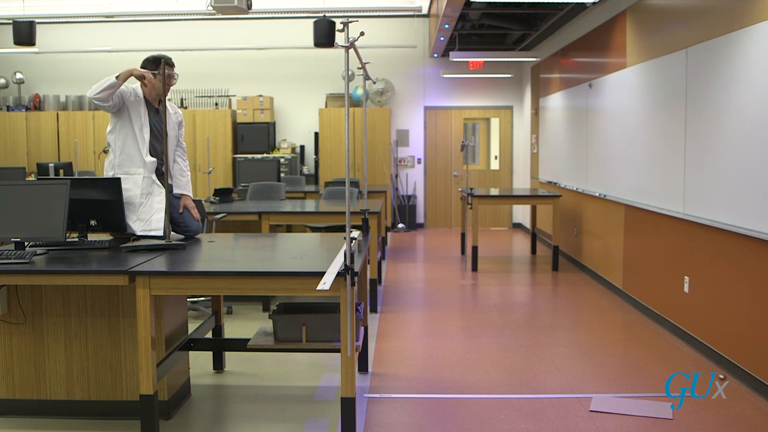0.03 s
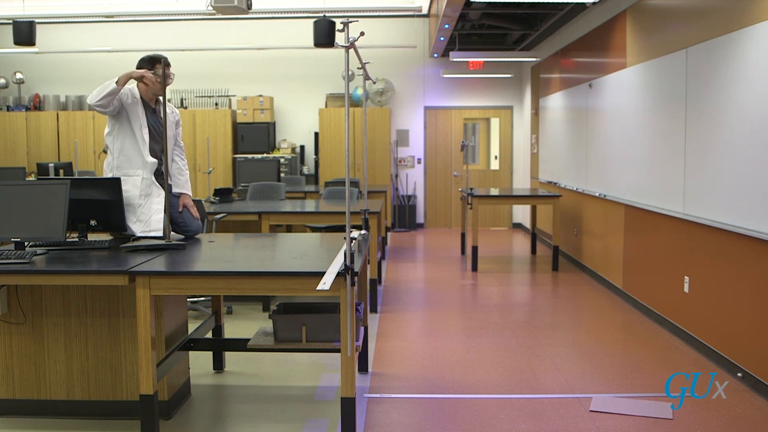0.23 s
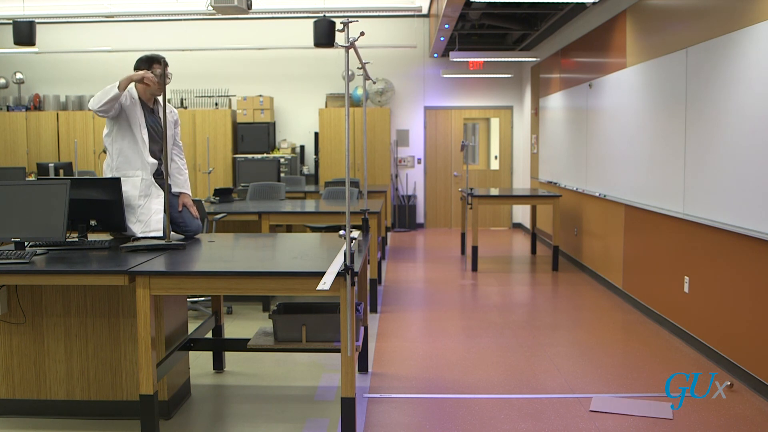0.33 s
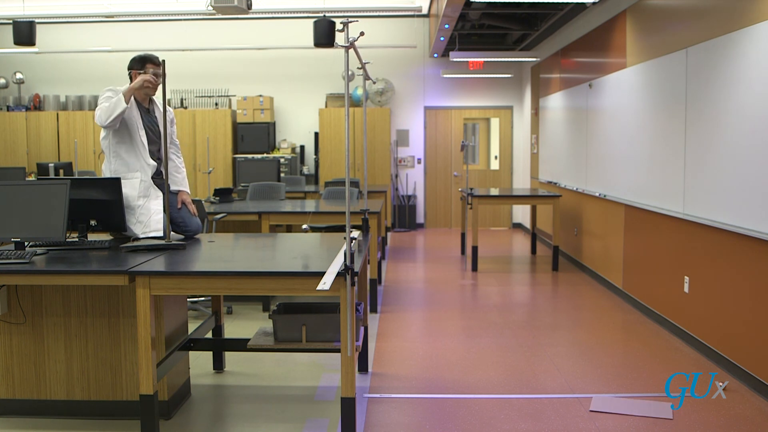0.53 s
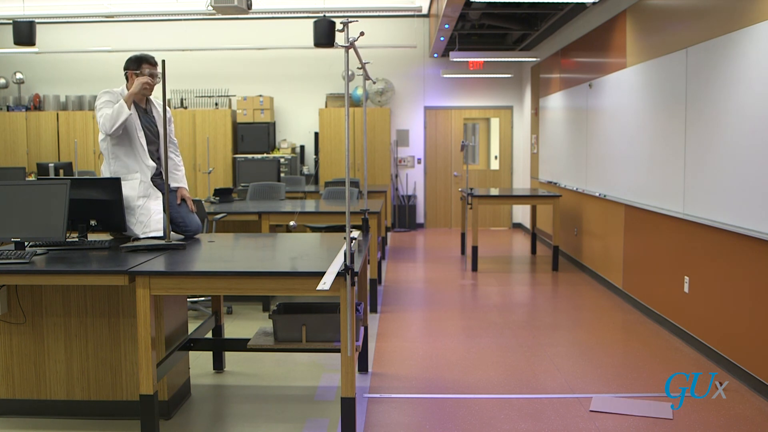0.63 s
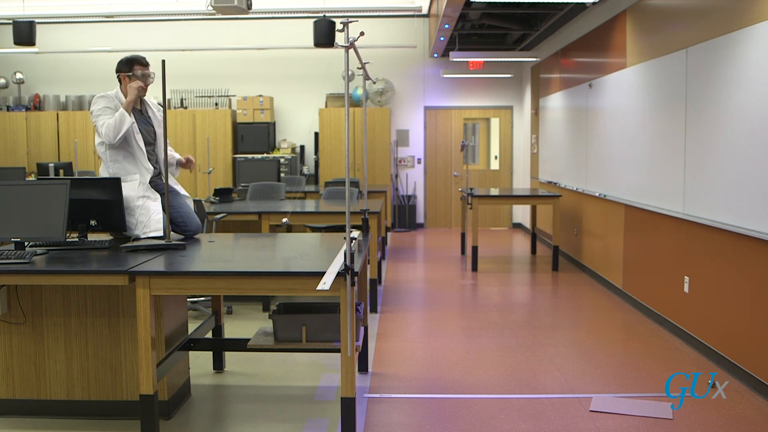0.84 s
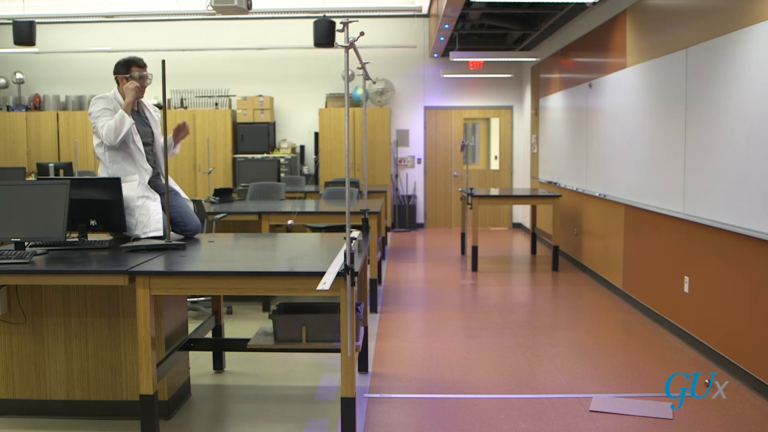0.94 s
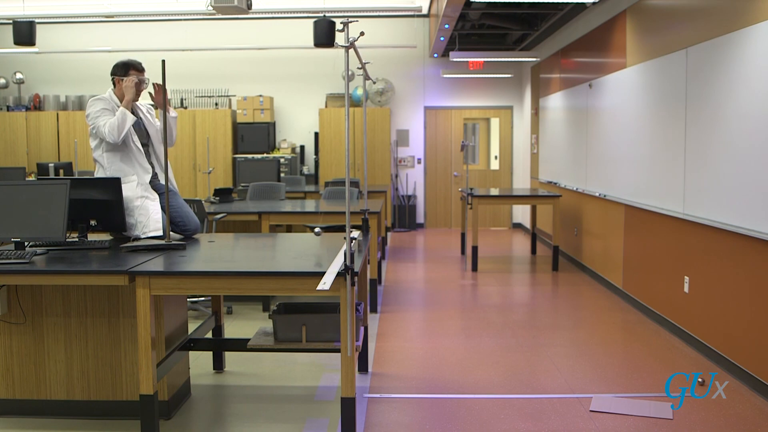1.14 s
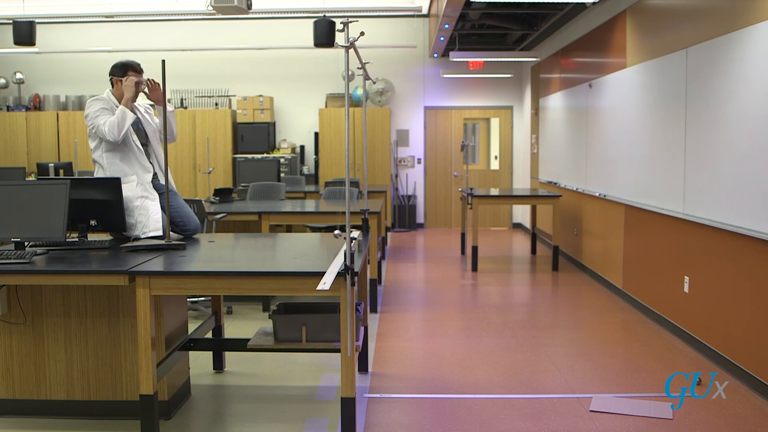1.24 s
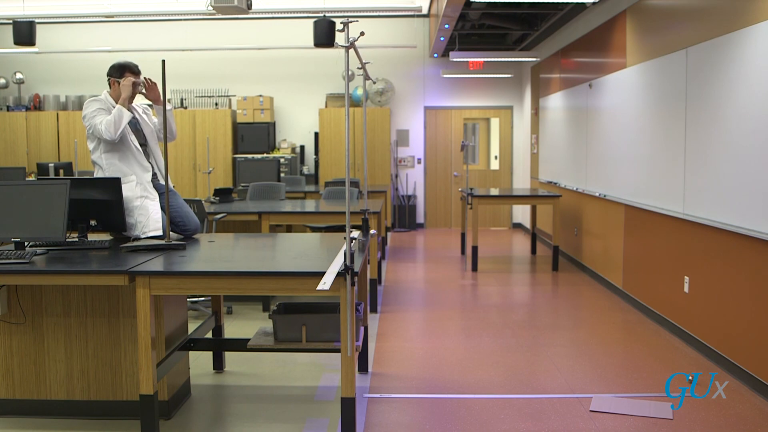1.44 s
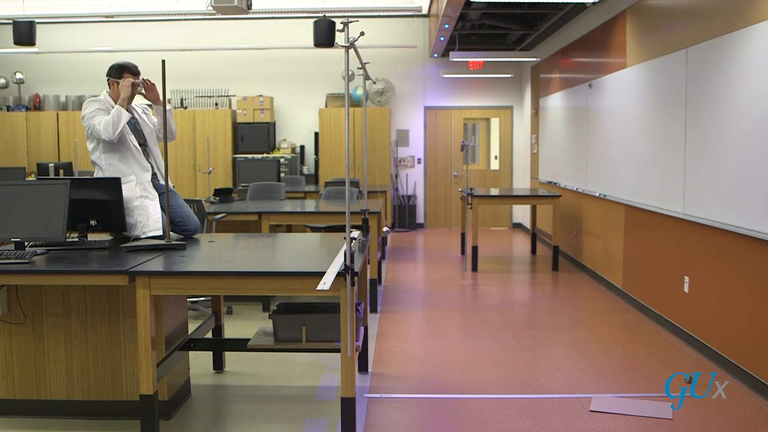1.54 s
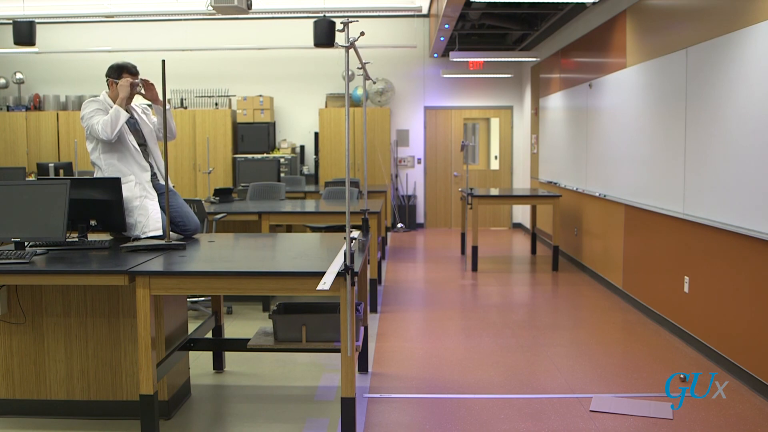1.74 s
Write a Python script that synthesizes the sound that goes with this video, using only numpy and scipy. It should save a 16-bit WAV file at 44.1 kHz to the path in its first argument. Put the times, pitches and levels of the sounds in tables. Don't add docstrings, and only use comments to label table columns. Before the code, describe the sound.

Small hard ball impacts in a furnished classroom lab: a woody bench thud, a quiet gap with faint cloth rustle, then a loud floor crack and softer bounce with short room ring, over low ventilation, single distant microphone.

```python
import sys
import numpy as np
from scipy import signal
from scipy.io import wavfile
from scipy.ndimage import uniform_filter1d

SR = 44100
rng = np.random.default_rng(int(sys.argv[2]) if len(sys.argv) > 2 else 0)


def dump(signal):
    limited = np.clip(np.atleast_2d(signal).T, -1, 1)
    pcm = np.round(limited * 32767).astype(np.int16)
    wavfile.write(sys.argv[1], SR, pcm)


def level_to_linear(level):
    exponent = np.asarray(level, float) / 20
    return 10 ** exponent


N = 79380

BENCH_LOW_HZ, FLOOR_LOW_HZ = 95, 330


def rms_one(x):
    return x / np.sqrt(np.mean(x ** 2) + 1e-20)


def at_hz(points, hz):
    curve_hz, value = np.transpose(points)
    return np.interp(np.log(hz), np.log(curve_hz), value)


def ring(clicks, hz, t60):
    radius = level_to_linear(-60 / (t60 * SR))
    angle = 2 * np.pi * hz / SR
    return signal.lfilter([0, np.sin(angle)], [1, -2 * radius * np.cos(angle), radius ** 2], clicks + 1e-18)


def highpass(x, low_hz):
    return signal.sosfilt(signal.butter(2, low_hz, "high", fs=SR, output="sos"), x)


def struck(contacts, modes, low_hz):
    out = np.zeros(N)
    for s, db, cut_hz, sign in contacts:
        spread_db = rng.normal(0, 2, 14) * (db < -4)
        soft = np.exp(-2 * np.pi * cut_hz / SR)
        for (hz, mode_db, t60, *delay), own_db in zip(modes, spread_db):
            i = int((s + sum(delay)) * SR)
            click = np.zeros(min(N - i, int(1.5 * t60 * SR)))
            click[0] = np.sign(sign) * level_to_linear(db + mode_db + own_db)
            pulse = signal.lfilter([(1 - soft) ** 2], [1, -2 * soft, soft ** 2], click)
            out[i:i + len(click)] += ring(pulse, hz, t60)
    return highpass(out + 1e-18, low_hz)


def bands():
    edges = 22 * 2 ** np.arange(0, 9.7, 1 / 3)
    white = rng.standard_normal((2, N))
    bank = []
    for k, (low, high) in enumerate(zip(edges, edges[1:])):
        band = signal.butter(2, [low, high], "band", fs=SR, output="sos")
        bank.append((np.sqrt(low * high), signal.sosfilt(band, white[k % 2])))
    return bank


def coloured(spectrum, bank, shape):
    gains = [level_to_linear(at_hz(spectrum, hz)) for hz, _ in bank]
    total = np.sqrt(sum(g * g * np.mean(x ** 2) for g, (_, x) in zip(gains, bank)))
    return sum(g * x * shape(hz) for g, (hz, x) in zip(gains, bank)) / total


def floor_knock():
    # start in seconds, level in dB, contact cutoff in Hz, direction as a sign.
    knocks = [
        (1.4004, -13, 5000, 1),
        (1.4012, -4, 5000, -1),
        (1.4019, -3, 7000, 1),
        (1.4248, -14, 4000, 1),
    ]
    # frequency in Hz, level in dB, t60 in seconds, optional delay in seconds.
    floor_modes = [(474.8, -22.5, 0.21), (672, -11, 0.019), (2100, -50, 0.035), (818, -28.5, 0.14),
                   (975.5, -26, 0.296, .012), (1186, -29.5, 0.11), (1200, -22, 0.15), (1400, -49, 0.29),
                   (1200, -20.5, 0.23), (2396, -11, 0.013), (2500, -26.5, 0.04), (3647, -30.5, 0.025),
                   (4850, -45.5, 0.24), (412.5, -28, 0.45, .01)]
    return struck(knocks, floor_modes, FLOOR_LOW_HZ)


def floor_rebound():
    # start in seconds, level in dB, contact cutoff in Hz, direction as a sign.
    bounces = [
        (1.4950, -16, 4000, 1),
        (1.4956, -3, 3000, -1),
        (1.4963, -3, 3500, 1),
        (1.4971, -4, 2500, -1),
        (1.5255, -8, 2000, 1),
    ]
    # frequency in Hz, level in dB, t60 in seconds.
    rebound_modes = [(474, -28.5, 0.16), (618, -28.5, 0.031), (698, -41.5, 0.45), (834, -32.5, 0.093),
                     (1300, -28, 0.015), (1386, -22.5, 0.1), (1632, -35.5, 0.47), (2500, -22.5, 0.013),
                     (2700, -32, 0.15), (3730, -36, .008)]
    return struck(bounces, rebound_modes, FLOOR_LOW_HZ)


def floor_crack():
    # start in seconds, level in dB, contact cutoff in Hz, direction as a sign.
    cracks = [
        (1.4015, 0, 8000, 1),
        (1.4960, -9, 2200, 1),
    ]
    # frequency in Hz, level in dB, t60 in seconds.
    crack_modes = [(1450, -14, .009), (4050, -22.5, .007), (4900, -29, .005), (204, -39, .75),
                   (213, -39, .75), (790, -22, .03), (555, -20, .06), (694, -36, .45)]
    return struck(cracks, crack_modes, BENCH_LOW_HZ)


def ball_ring():
    # frequency in Hz, level in dB, t60 in seconds.
    ball_modes = [(15500, -54, .22), (15506, -57, .35)]
    return struck([(1.403, 0, 20000, 1)], ball_modes, 1000)


def bench_thud():
    # start in seconds, level in dB, contact cutoff in Hz, direction as a sign.
    thuds = [
        (.2094, 0, 8000, 1),
        (.2191, -9, 1500, 1),
        (.2230, -4.5, 1800, 1),
        (.2292, -8, 1200, 1),
    ]
    # frequency in Hz, level in dB, t60 in
    # seconds, delay in seconds.
    body_modes = [(600, -7, .013, 0), (300, -18, .012, 0),
                  (276, -28.5, .3, 0.01147), (560, -22, 0.044, .004), (484, -28.5, 0.041, .006),
                   (870, -28.5, 0.039, 0.0024), (1302, -32.5, 0.065, .002), (1700, -25.5, .06, 0.0048),
                   (2102, -33.5, 0.074, .006), (4350, -46.5, 0.067, 0.0056), (11500, -46, 0.059, 0.02),
                   (110, -25.5, 0.22, .012)]
    top_modes = [(178, -9.5, .055, .0041), (2900, -18, .010, .0012), (3020, -18.5, .017, .0042),
                 (3230, -18.5, .014, .0046), (7420, -30, .025, .004), (602, -19, .06, .0033),
                 (3080, -24, .012, .0105), (2650, -27, .01, .020), (166, -19, .12, .052)]
    body = struck(thuds, body_modes, BENCH_LOW_HZ)
    return body + struck(thuds[:1], top_modes, BENCH_LOW_HZ)


def early_echoes():
    # arrival in seconds, level in dB, cutoff in Hz, direction as a sign.
    reflections = [(1.4055, -8, 4000, 1), (1.4095, -9, 5000, 1), (1.4125, -12, 2500, 1),
                   (1.4150, -7, 6000, -1), (1.4212, -4.5, 5000, 1), (1.4252, -8.5, 5000, 1),
                   (1.4282, -13, 4000, 1), (1.4312, -14, 5000, 1), (1.4372, -10, 2500, 1),
                   (1.4485, -13, 4000, 1), (1.5000, -9, 3000, 1), (1.5045, -11, 4000, 1),
                   (1.5112, -15, 5000, 1), (1.5150, -11, 3500, 1), (1.5253, -21, 2500, 1)]
    # frequency in Hz, level in dB, t60 in seconds.
    echo_modes = [(685, -14.5, 0.0066), (1390, -16, 0.0043), (2370, -19.5, 0.0073), (3850, -30, .005),
                  (4650, -45, 0.0055)]
    return struck(reflections, echo_modes, FLOOR_LOW_HZ)


def tails():
    # start in seconds, late level in dB, early level in dB, early t60 in seconds,
    # early tilt in dB per octave.
    room_tails = [
        (-.02, -47.5, -50.5, 0.13, -7.5),
        (0.174, -58, -41.5, 0.13, -5.5),
        (0.209, -16.5, -23.5, 0.051, 6),
        (1.4005, -26.5, -16, 0.072, -2),
        (1.4956, -33, -23, 0.086, -0.7),
    ]
    # frequency in Hz, spectral density in dB.
    clack_colour = [(47, -55.5), (80, -18.5), (109, -13), (253, -14.5), (361, -9.5), (1670, -12.5),
                    (2900, -16), (3790, -12.5), (16000, -37.5)]
    tick_colour = [(150, -11.5), (900, -2), (1600, 1), (2900, -10.5), (4200, -22.5), (9000, -46)]
    thud_colour = [(25, -26.5), (65, -22.5), (115, -5), (280, -1.5), (750, -13.5), (2000, -24),
                   (5000, -44.5), (16000, -55.5)]
    knock_colour = [(85, -1), (140, -24.5), (200, -8.5), (290, -11.5), (480, -7), (2430, -14.5),
                    (5500, -32.5), (15000, -53)]
    bounce_colour = [(30, -46), (81, 4), (140, -56), (200, -14), (600, -4), (2700, -15.5), (5500, -43.5),
                     (15000, -79)]
    # frequency in Hz, t60 in seconds.
    room_decay = [(60, 0.53), (200, 0.88), (500, 0.68), (1200, 0.76), (2500, 0.6), (5000, 0.56),
                  (9000, 0.32), (15000, 0.67)]
    stretches = [0.87, 0.84, 0.91, 0.82, 0.99]
    # rise in seconds, extra rise in cycles.
    builds = [(.002, 2), (.004, 2), (.004, 11), (.003, 3), (.004, 3)]
    colours = [clack_colour, tick_colour, thud_colour, knock_colour, bounce_colour]
    out, bank = np.zeros(N), bands()
    for tail, colour, stretch, (rise_s, cycles) in zip(room_tails, colours, stretches, builds):
        s, late_db, early_db, early_t60, tilt_db = tail
        i = max(int(s * SR), 0)
        t = np.arange(i, min(N, i + SR)) / SR - s
        first = rng.integers(4000, N - SR)
        part = [(hz, x[first:first + len(t)]) for hz, x in bank]

        def decay(hz):
            build = 1 - np.exp(-t / (rise_s + cycles / hz))
            late = level_to_linear(late_db - 60 * t / stretch / at_hz(room_decay, hz))
            early = level_to_linear(early_db + tilt_db * np.log2(hz / 500) - 60 * t / early_t60)
            return build * (late + early)

        out[i:i + len(t)] += coloured(colour, part, decay)
    return out


def clack_lines():
    # frequency in Hz, level in dB, width in Hz.
    resonances = [(371, -61, 15), (1658, -67, 15), (2213, -67, 30), (3670, -60.5, 70), (3810, -60.5, 110),
                  (4650, -68, 150)]
    lines = np.zeros(N)
    for hz, db, width in resonances:
        lines += level_to_linear(db) * rms_one(ring(rng.standard_normal(N), hz, 2.2 / width))
    t60_s = 0.66
    return lines * level_to_linear(-60 * np.arange(N) / SR / t60_s)


def coat():
    # time in seconds, level in dB.
    motion = [
        (0.74, -82),
        (0.806, -71.5),
        (0.88, -79.5),
        (0.9, -91),
        (0.908, -80),
        (0.93, -72),
        (1.048, -66),
        (1.096, -66.5),
        (1.24, -82),
    ]
    # frequency in Hz, spectral density in dB.
    cloth_colour = [(88, -34), (150, 3), (985, -13), (1220, -17.5), (1640, -18), (11900, -22.5),
                    (16300, -26)]
    s, db = np.transpose(motion)
    times = np.r_[s[0] - .05, s, s[-1] + .05]
    level_db = np.interp(np.arange(N) / SR, times, np.r_[-110, db, -110])

    def grain(hz):
        return level_to_linear(0.9 * rms_one(uniform_filter1d(rng.standard_normal(N), size=300)))

    return level_to_linear(level_db + 5.5) * coloured(cloth_colour, bands(), grain)


def snaps():
    # start in seconds, peak level in dB, frequency in Hz, width in Hz.
    small_clicks = [(0.175, -60, 12000, 4000), (0.184, -52.5, 1400, 894), (0.437, -59, 13600, 3000),
                    (0.875, -61.5, 1000, 409), (0.9, -54, 11000, 6100), (1.012, -62.5, 2000, 150),
                    (1.033, -51, 10900, 5920), (1.149, -65.5, 7900, 7000), (1.371, -61, 5770, 1475),
                    (1.55, -68, 14000, 2920), (1.66, -64, 9300, 6030), (1.754, -61, 8500, 6000)]
    out = np.zeros(N)
    for s, db, hz, width in small_clicks:
        burst = rng.standard_normal(400) * level_to_linear(-60 * np.arange(400) / SR / 0.013)
        snap = ring(burst, hz, 4.5 / width)
        i = int(s * SR)
        out[i:i + 400] += level_to_linear(db) * snap / np.abs(snap).max()
    return out


def ventilation():
    # frequency in Hz, spectral density in dB.
    air_colour = [(12, -54), (20, -7.5), (53, -8.5), (91, -7), (312, -20.5), (881, -26.5), (2280, -36),
                  (6820, -38.5), (16300, -41)]
    return level_to_linear(-65.5) * coloured(air_colour, bands(), lambda hz: 1)


def scene():
    impacts = floor_knock() + floor_rebound() + floor_crack() + ball_ring() + bench_thud()
    room = early_echoes() + tails() + clack_lines()
    background = coat() + snaps() + ventilation()
    return (impacts + room + background)[None]


def roll_off(x):
    return signal.sosfilt(signal.butter(12, 16410, fs=SR, output="sos"), x)


def record(dry):
    top_hz, mic_low_hz = 16650, 18
    mix = signal.sosfilt(signal.cheby2(12, 70, top_hz, fs=SR, output="sos"), dry)
    mix = highpass(mix, mic_low_hz)
    return roll_off(mix)


dry = scene()
out = record(dry)
dump(out)
```